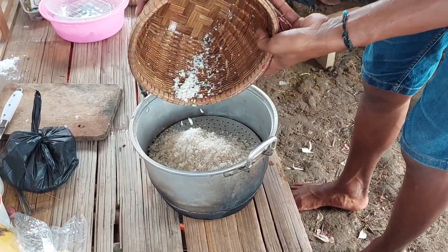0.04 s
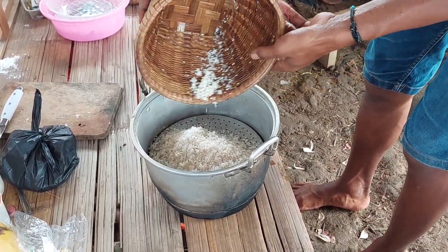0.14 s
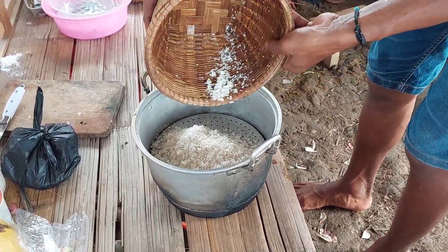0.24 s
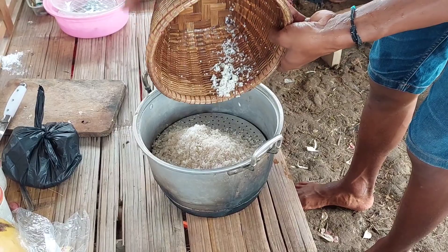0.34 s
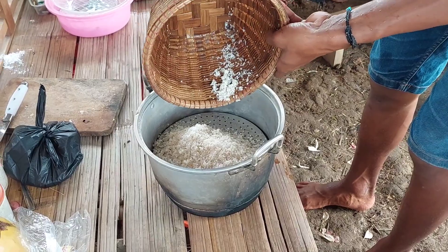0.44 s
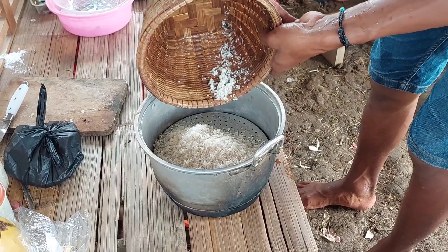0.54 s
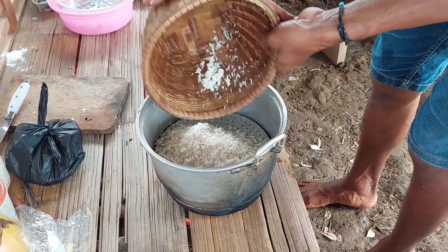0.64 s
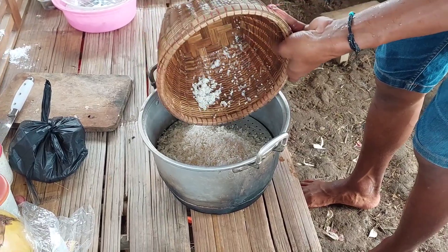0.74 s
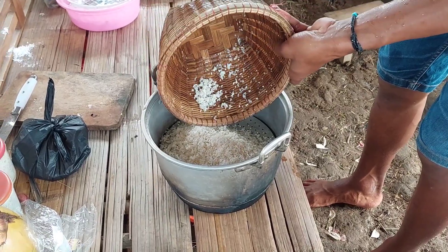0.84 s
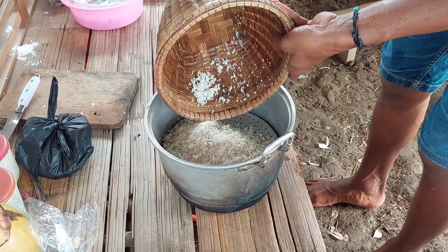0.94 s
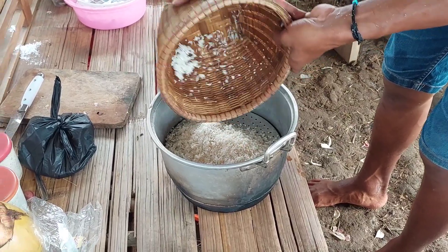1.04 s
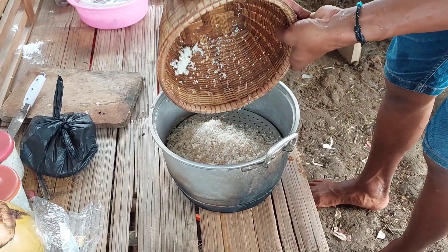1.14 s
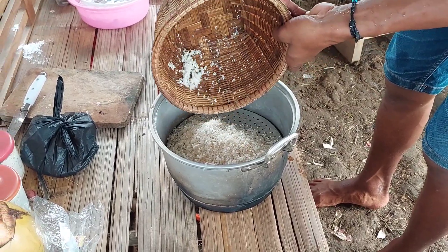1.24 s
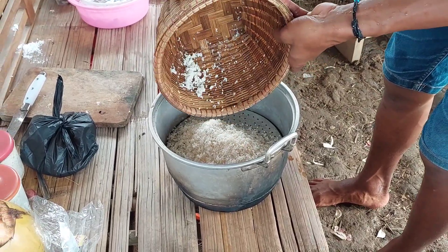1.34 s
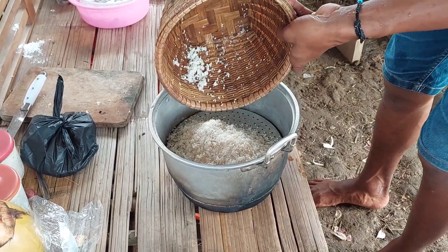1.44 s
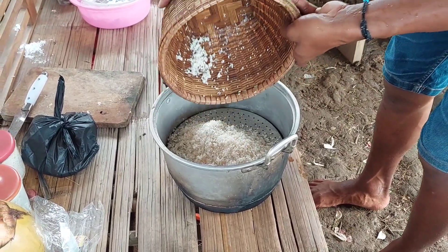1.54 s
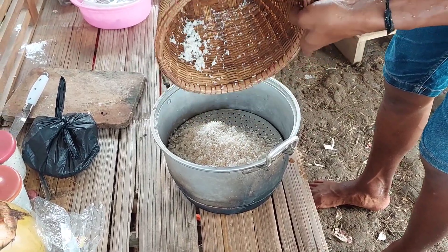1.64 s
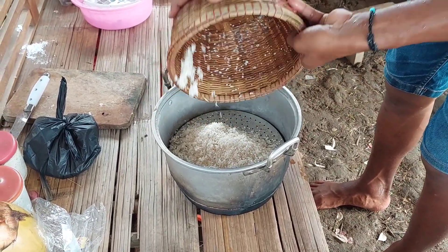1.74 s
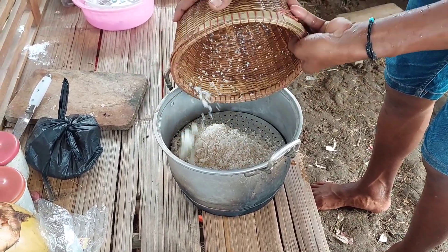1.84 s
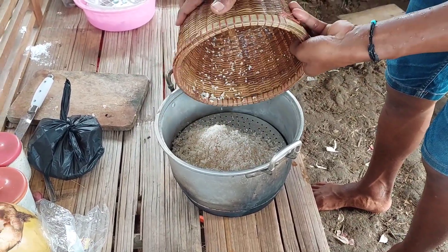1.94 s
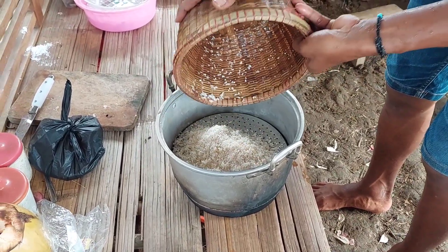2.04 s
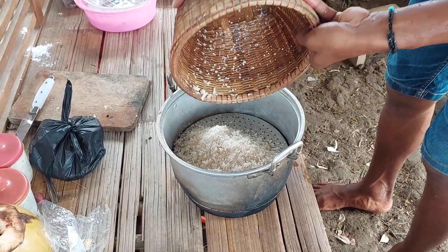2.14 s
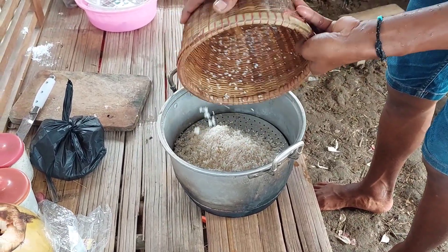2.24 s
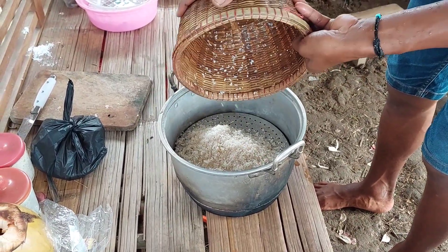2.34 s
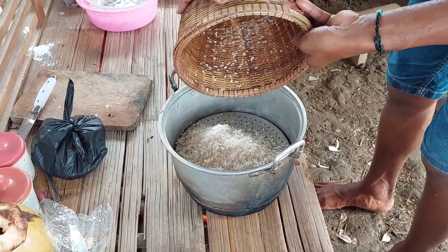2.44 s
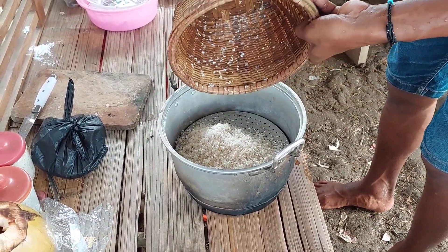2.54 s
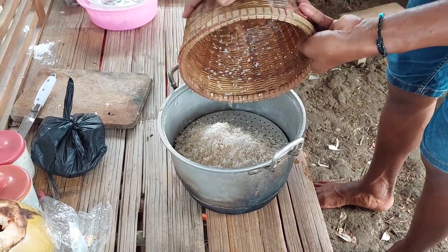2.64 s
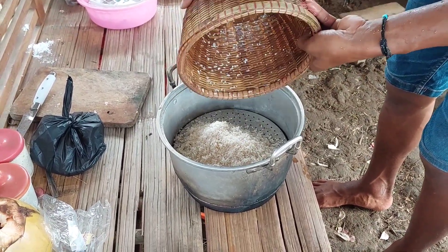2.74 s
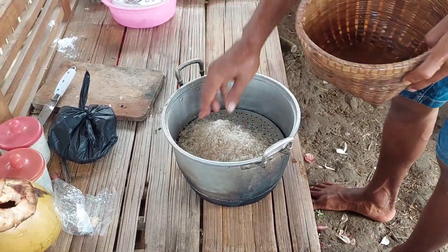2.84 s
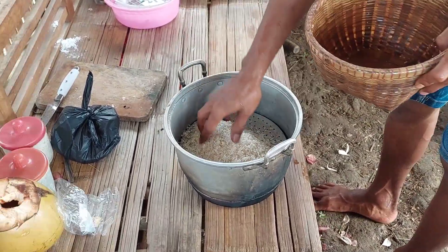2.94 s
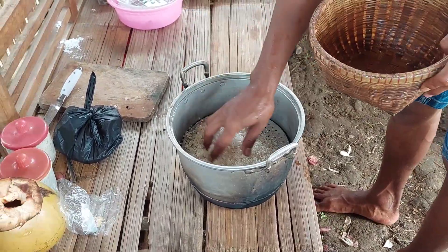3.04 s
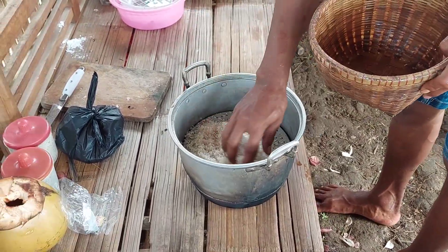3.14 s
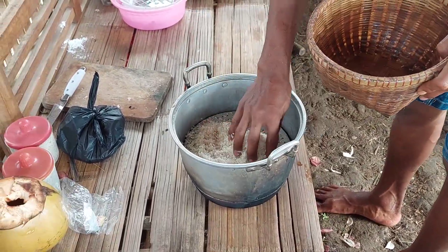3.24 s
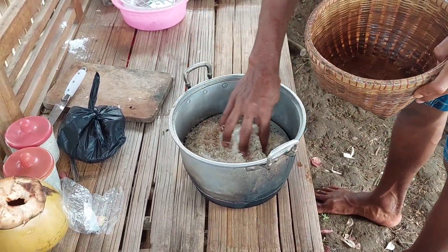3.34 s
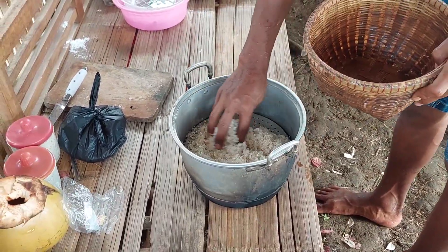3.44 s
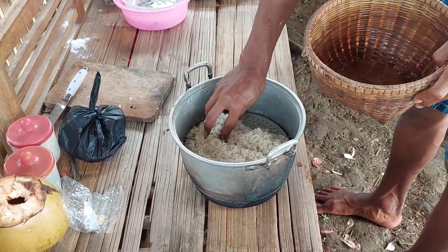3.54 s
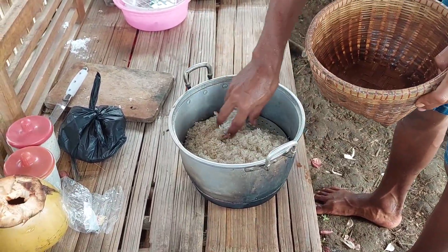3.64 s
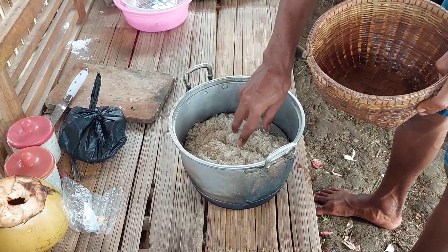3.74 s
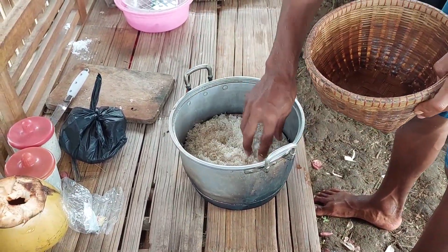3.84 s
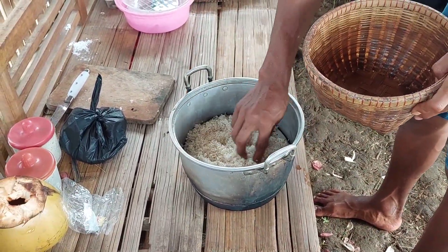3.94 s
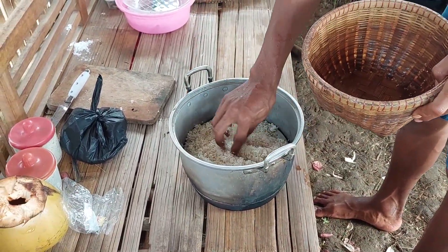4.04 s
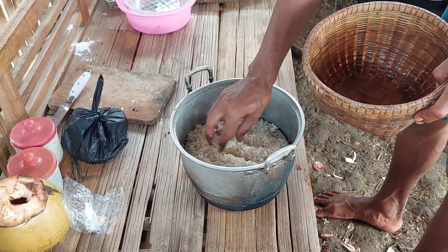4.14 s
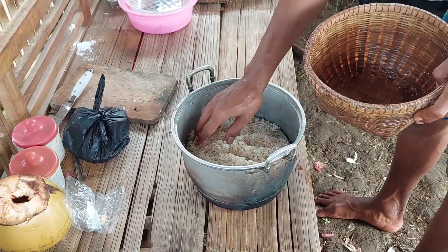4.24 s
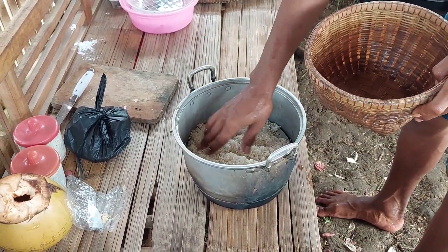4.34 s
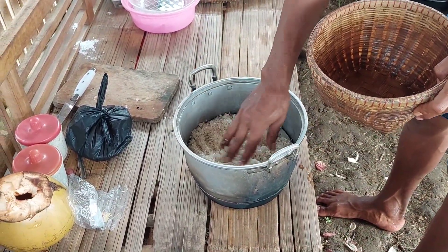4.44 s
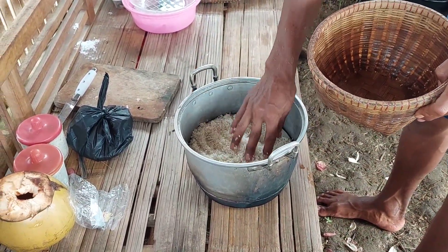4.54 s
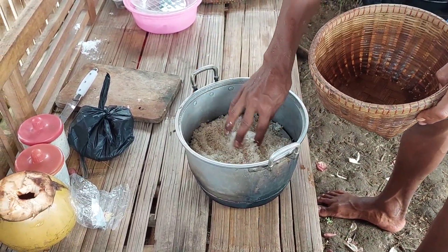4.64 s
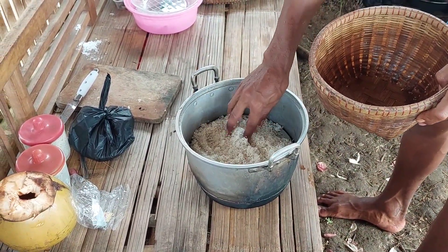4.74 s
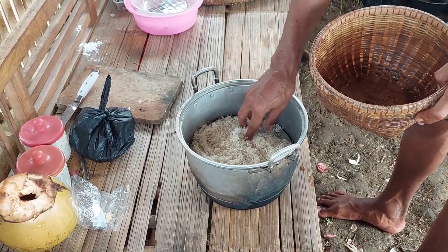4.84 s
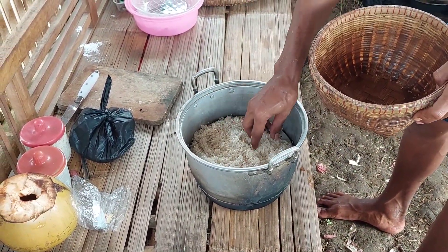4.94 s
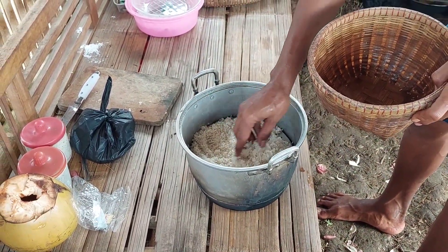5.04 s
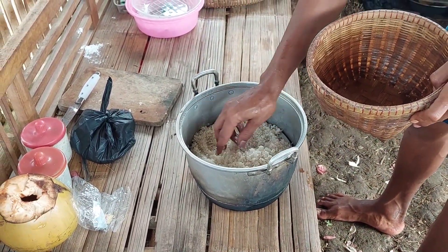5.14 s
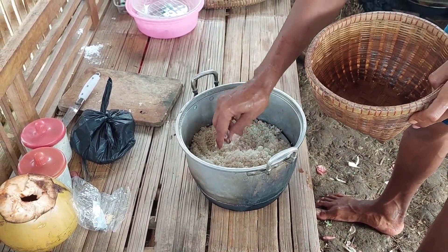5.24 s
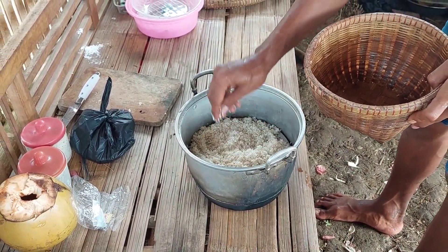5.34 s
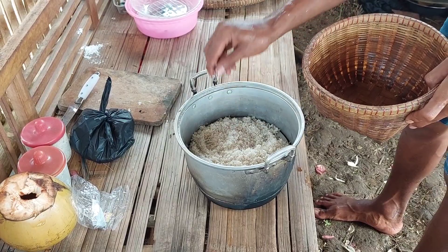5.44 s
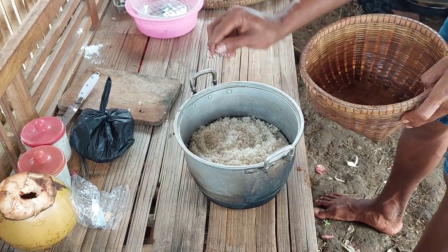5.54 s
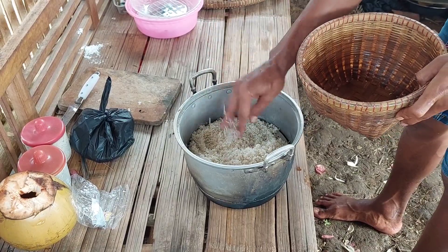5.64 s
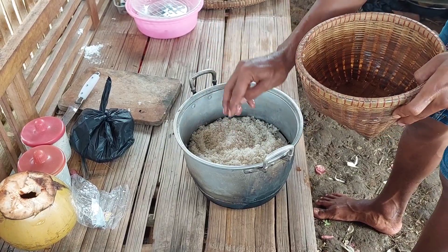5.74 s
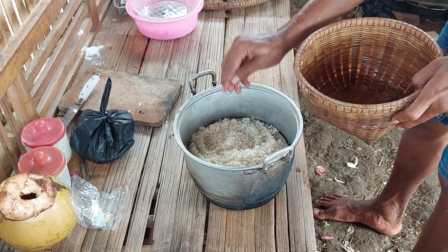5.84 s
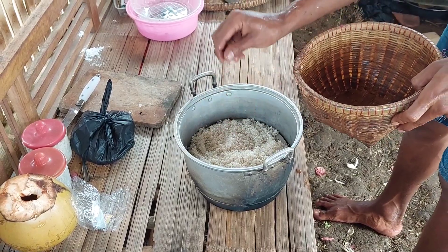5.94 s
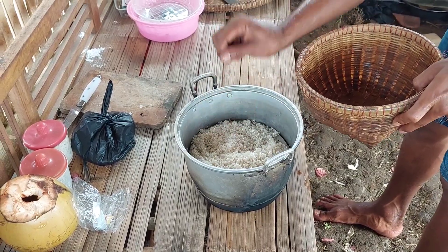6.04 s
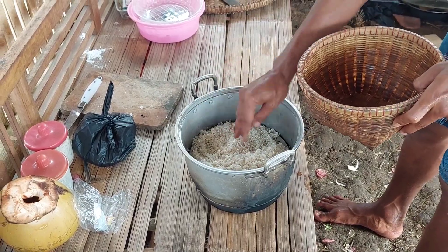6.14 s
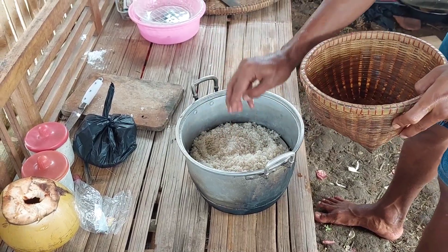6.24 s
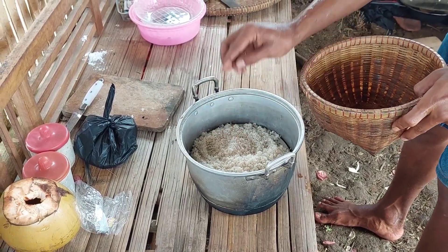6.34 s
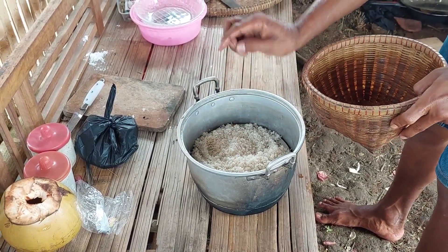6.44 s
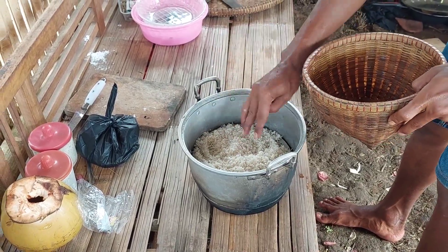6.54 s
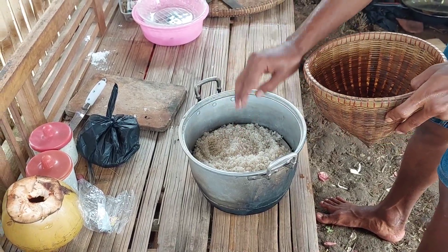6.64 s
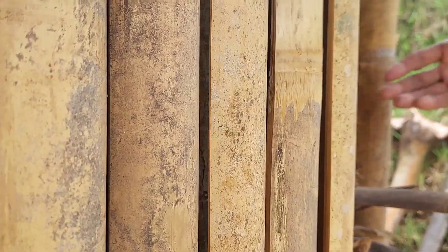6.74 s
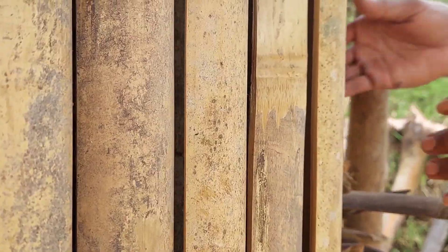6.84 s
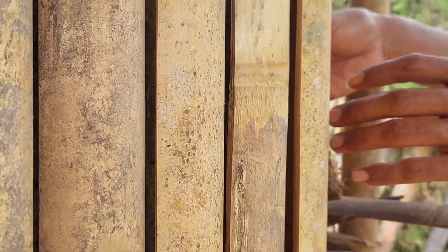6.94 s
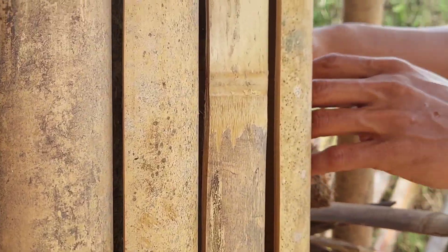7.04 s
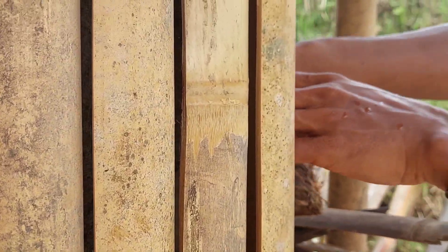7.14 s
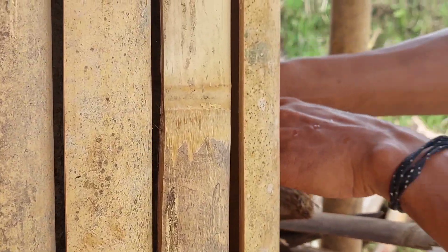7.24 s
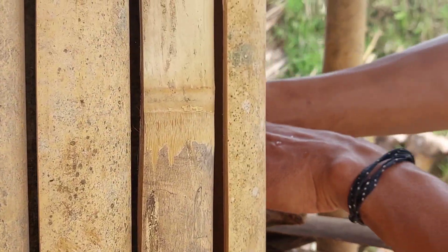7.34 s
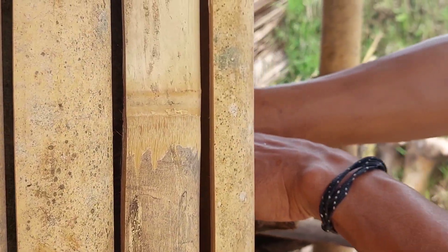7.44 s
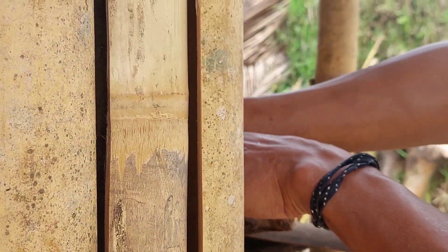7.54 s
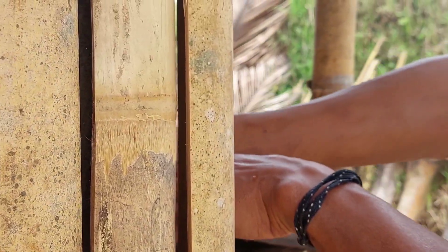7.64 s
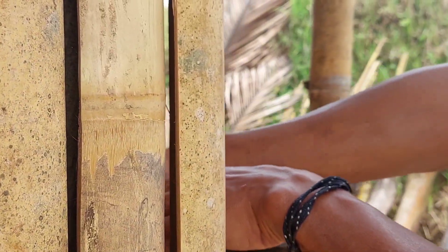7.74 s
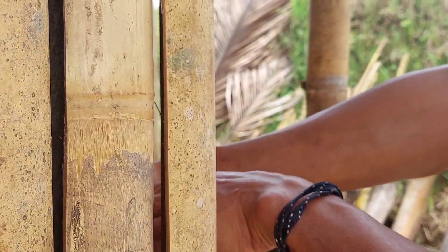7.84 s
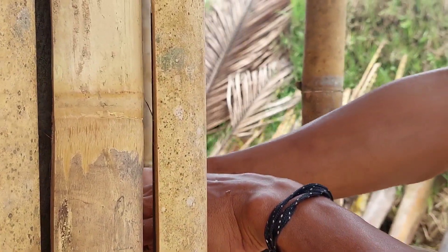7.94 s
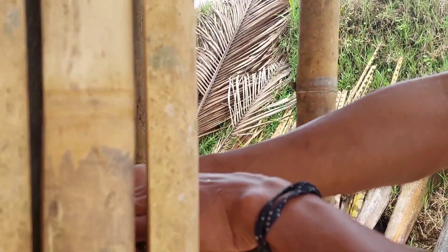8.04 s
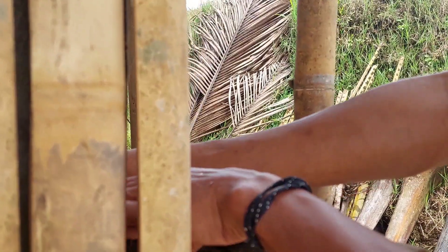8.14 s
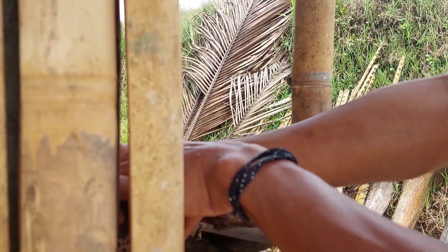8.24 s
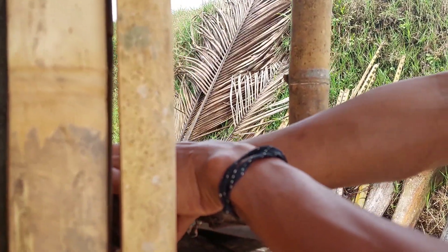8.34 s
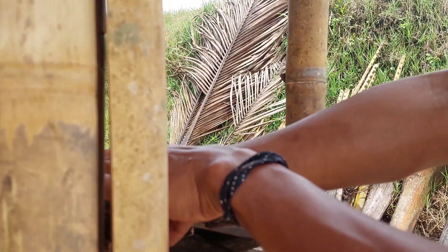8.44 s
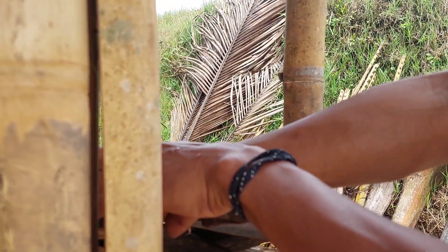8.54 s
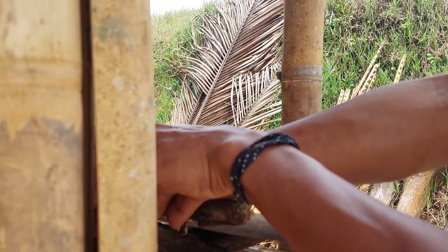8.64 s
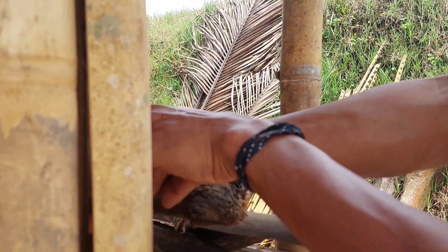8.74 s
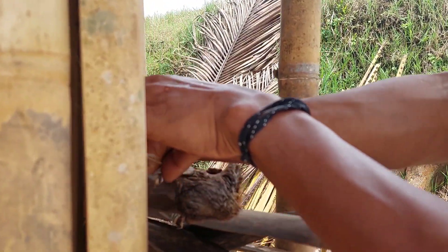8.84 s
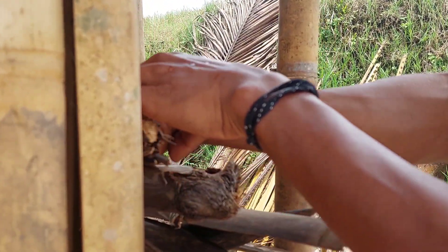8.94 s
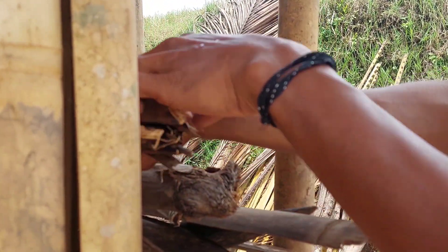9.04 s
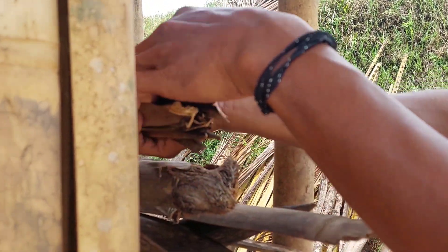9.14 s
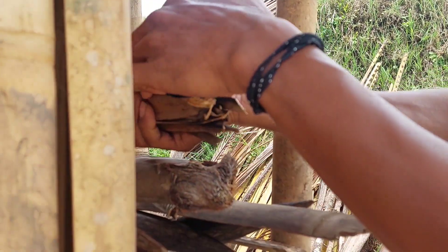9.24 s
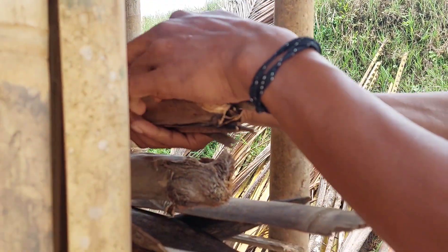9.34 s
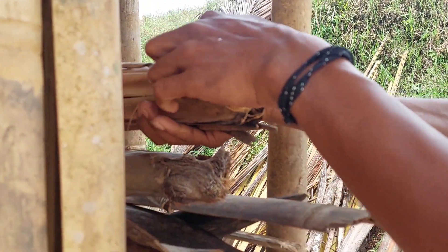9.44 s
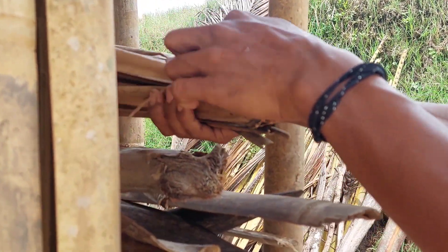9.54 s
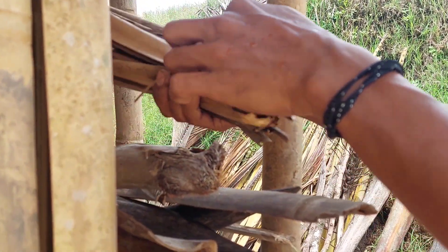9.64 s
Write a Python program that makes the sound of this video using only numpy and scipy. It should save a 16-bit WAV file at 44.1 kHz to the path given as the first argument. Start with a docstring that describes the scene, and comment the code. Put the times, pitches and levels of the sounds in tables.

```python
"""Countryside hum and hiss, filtered noise, lie under a first trickle of rice: crackling grains in slides and clumps.
In this outdoor kitchen, heard by a two-port phone, a hand knocks a woven basket over a metal pot: damped modes
with a noisy weave and crack. Fingers level the rice, with a few soft bumps in the pot. Then, much closer, dry
palm leaves are pulled and crushed as crackle flurries and short snaps. Gusts buffet each port with its own
low noise, and fluttering slaps of air top them."""
import sys
import numpy as np
from scipy import signal
from scipy.fft import rfft, irfft, next_fast_len
from scipy.io import wavfile
from scipy.ndimage import uniform_filter1d

SR = 44100
rng = np.random.default_rng(int(sys.argv[2]) if len(sys.argv) > 2 else 0)


def to_wav(sig):
    """Store sig (one row per channel, or 1-D mono) as 16-bit WAV at the path in sys.argv[1].

    Samples outside -1..1 are clipped; the rate is SR.
    """
    pcm = np.clip(np.atleast_2d(sig), -1, 1) * 32767
    pcm = np.round(pcm).astype(np.int16)
    wavfile.write(sys.argv[1], SR, pcm.T)  # frames by channels


N = 427769
T = np.arange(N) / SR
MS = T[::SR // 1000]  # slow clock, steps of about a millisecond
SIDES = np.array([[0.5], [-0.5]])  # left and right share of a left-right difference

# Distant land: f/Hz, relative level/dB per Hz
LAND_COLOUR = [(15, -39.5), (30, 1.5), (64, 1.5), (117, 3), (195, -8), (270, -5.5), (659, -16),
               (754, -20.5), (2760, -6), (7110, -9.5), (8590, -13), (14800, -12.5), (16000, -11)]
LAND_DB = -54
# Far sounds, bassier at left, which loses treble from the right: f/Hz, left minus right/dB
PORTS_FAR = [(60, 3.5), (110, 8.5), (200, 8), (380, 3.5), (700, 4.5), (1290, 1), (2380, -0.5), (4400, 1.5),
             (8120, -4), (15000, -7)]

# Rice sliding over the weave or pushed by the fingers: t/s, hold/s, patter level/dB, relative dull rattle/dB
SLIDES = [(0.138, 0.048, -57, -3), (0.228, 0.18, -60.5, -15), (0.478, 0.13, -45.5, -2.5),
          (0.647, 0.045, -49.5, -25), (0.786, 0.092, -57, -17), (0.89, 0.082, -45.5, -5),
          (0.984, 0.12, -50.5, -8.5), (1.152, 0.012, -45.5, -17), (1.212, 0.33, -61, -5),
          (1.629, 0.018, -47, -14), (1.745, 0.01, -39, -13), (1.88, 0.029, -59.5, -8),
          (2.086, 0.016, -51, -26), (2.192, 0.027, -51, -17), (2.354, 0.05, -55.5, -1.5),
          (2.492, 0.065, -53, -4.5), (2.92, 0.022, -57, -13), (2.992, 0.046, -51, -8),
          (3.064, 0.079, -42, -13), (3.196, 0.015, -55, 0), (3.31, 0.026, -56, -3), (3.415, 0.01, -44, -18),
          (3.49, 0.074, -45.5, -3), (4.295, 0.066, -55.5, -22), (4.662, 0.05, -54.5, -6),
          (5.312, 0.057, -58, -19), (5.485, 0.019, -55.5, -5), (5.65, 0.067, -57, -10.5),
          (6.297, 0.026, -61, -22)]
SLIDE_RISE_DB_S, SLIDE_FALL_DB_S = 402.5, 202
# Grain patter: f/Hz, relative level/dB per Hz
RICE_COLOUR = [(180, -45.5), (300, -6.5), (667, -1.5), (828, -2.5), (1010, -2), (1340, -1), (4090, 4.5),
               (7080, -6.5), (9240, -20.5), (12500, -10), (16000, -7.5)]
# Grains that land at once: t/s, ring peak level/dB, centre f/Hz, bright tick setting/dB relative to the ring
CLUMPS = [(0.243, -37, 2180, -28), (0.585, -27, 2330, -7), (0.698, -46, 440, 19), (1.036, -38.5, 2210, -21),
          (1.146, -29.5, 4940, 2), (1.16, -39, 3900, 3), (1.36, -42.5, 656, -21), (1.727, -30.5, 3760, -3),
          (2.117, -39.5, 1100, 14.5), (2.228, -38.5, 5860, 3), (2.569, -45, 1170, 19),
          (2.57, -38.5, 3400, -8), (2.857, -36.5, 4380, -20), (3.139, -37, 4300, 14), (3.206, -44, 5060, 8),
          (3.415, -29, 2100, -10), (3.652, -37, 2530, -11), (4.32, -40, 2870, -27), (4.359, -44, 4300, -25),
          (4.52, -41, 2720, -22), (5.369, -43.5, 3540, -20), (5.483, -34.5, 2410, -33),
          (5.757, -42.5, 2140, -20), (5.914, -40, 2070, -18), (6.295, -42.5, 2160, -23)]
TRICKLE_DB, TRICKLE_DULL_DB, TRICKLE_END_S = -63.5, -4.5, 6.85  # stray grains between the slides
BRIGHT_DB, BRIGHT_PER_DB = -6.5, 0.5  # relative treble of the patter at -51 dB; louder slides are brighter
# Edges of the flickering bands in rice and leaves: f/Hz
BAND_EDGES_HZ = [250, 700, 1400, 2500, 4300, 8000, 11500, 17000]

# Palm on the basket: t/s, level setting/dB, nominal contact/ms, struck spot f/Hz, ring length factor,
# left minus right/dB, rebound level/dB, crack setting/dB
KNOCKS = [(0.4593, -29.5, 0.1, 370, 0.84, 1.5, -11, 13.5), (0.8607, -22.5, 0.55, 520, 0.99, 0, -13.5, 10),
          (3.0353, -24, 0.5, 627, 0.58, 0, -22.5, 9)]
# Basket and pot modes, before each blow's spread: f/Hz, relative level/dB, t60/s at ring length factor 1
BASKET = [(111, 8, 0.068), (302, 6, 0.091), (404, -1, 0.045), (520, -4.5, 0.12), (590.5, -1, 0.12),
          (664, 1.5, 0.16), (757, -6.5, 0.16), (780, -5, 0.1), (911, -1.5, 0.086), (1060, 6, 0.024),
          (1355, -15, 0.051), (1990, -7.5, 0.037), (2180, -1, 0.078), (2530, -6, 0.03945)]
BOUNCE_S = 0.013  # the basket swings back against the fingers, twice

# Hand bumping softly in the pot: t/s, level/dB (4 dB below the peak), centre f/Hz
BUMPS = [(3.699, -52, 680), (4.298, -53, 304), (4.799, -51.5, 470), (4.901, -54.5, 299)]

# Crushed leaves, points on a curve: t/s, rustle level/dB, relative bright sizzle/dB, relative dull scrape/dB
LEAVES = [(6.75, -81, 6, 0), (6.95, -41, -0.5, -10.5), (7.06, -49, 1, -5.5), (7.46, -39.5, 0.5, -6.5),
          (7.6, -46, 2.5, -4), (7.73, -36, -8, -8), (7.76, -44.5, 0.5, -3.5), (7.93, -39.5, -2, -7.5),
          (8.02, -37, -2, -4), (8.065, -35, 0.5, -4), (8.1, -36, -3, -9.5), (8.122, -31, -6, -8),
          (8.165, -41, -2, -3), (8.22, -42, 0, -7.5), (8.257, -37, -3, -3), (8.275, -38, 0.5, -12),
          (8.37, -46, 4, -7), (8.51, -32.5, -6, -7), (8.52, -40, -5, -3.5), (8.85, -37, -2, -9.5),
          (8.9, -40, 1, -11), (9.2, -49.5, -9, -4.5), (9.27, -54, -11, 0), (9.35, -49.5, -11, -13),
          (9.38, -36.5, -14, -15), (9.43, -48.5, -7, -6.5), (9.5, -43.5, -7, -6.5), (9.525, -40.5, -9, -2),
          (9.57, -43, -9, -3), (9.63, -49, -7, 0.5), (9.7, -47.5, -3, -5)]
# Leaf crackle: f/Hz, relative level/dB per Hz
LEAF_COLOUR = [(290, 5.5), (500, 6), (595, 5), (855, 5), (1180, 3.5), (2330, 10), (5020, 8), (8580, 1),
               (12300, 10), (14900, 3), (16000, 11)]
# Near sounds, with the top end weaker at left: f/Hz, left minus right/dB
PORTS_NEAR = [(2000, 0), (6000, -0.5), (8000, 0.5), (10000, -13.5), (15000, -18.5)]
# Leaf ribs that snap: t/s, ring peak level/dB, centre f/Hz, bright tick setting/dB relative to the ring
SNAPS = [(6.8896, -44, 1420, 17), (7.299, -31, 5000, -10), (7.328, -27, 5630, -4),
         (7.3703, -30.5, 3840, 14), (7.378, -22, 760, -20), (7.441, -17.5, 4170, -2), (7.467, -27, 3800, 0),
         (7.555, -32, 3000, -8), (7.589, -33, 3200, -8), (7.6262, -32, 5040, 9), (7.645, -20.5, 2870, -2),
         (7.68, -28, 4800, 0), (7.7095, -19.5, 2800, -6), (7.7138, -13.5, 820, -20),
         (7.7145, -17.5, 2400, -0.5), (7.7876, -31.5, 3600, 6.5), (7.845, -25, 2950, 3),
         (7.874, -25, 2800, -4), (7.9408, -22.5, 2400, 2.5), (8.0032, -20, 3050, -14),
         (8.0365, -19.5, 2260, -14), (8.065, -13, 2440, -4), (8.1917, -25.5, 5200, 4),
         (8.2497, -18.5, 3080, -23), (8.2937, -17.5, 3230, -23), (8.45, -24, 2180, -10),
         (8.4914, -19, 1830, -8), (8.556, -19.5, 2720, -6), (8.5815, -15.5, 1870, 0),
         (8.6246, -25.5, 2360, 9), (8.7006, -22, 2180, -18), (8.7399, -20.5, 3000, 7),
         (8.8044, -17.5, 2120, -1), (8.838, -21, 2620, -5), (8.985, -22, 2030, 1), (9.047, -24, 1990, 6),
         (9.1446, -23, 3930, -37), (9.1757, -23, 4540, -11), (9.1765, -25.5, 1370, -20),
         (9.2056, -29, 3560, -29), (9.3616, -19.5, 2460, -26), (9.3886, -25, 3370, -6),
         (9.4706, -29, 2870, -19), (9.5138, -16, 4900, -2.5)]
TICKS_PER_S, TICK_DB, TICK_MS = 43, 6.5, 0.99  # small veins that break: rate, gain, decay time
FLURRY_DB = 1  # spread of the crackle's level

# Gusts on one port: t/s, hold/s, buffet level/dB before speed shaping, port (0 left, 1 right)
GUSTS = [(6.942, 0.032, -46, 0), (7.092, 0.14, -44, 1), (7.3, 0.087, -40.5, 1), (7.384, 0.026, -40, 0),
         (7.44, 0.039, -20.5, 1), (7.658, 0.046, -30, 1), (7.712, 0.027, -20, 1), (7.808, 0.18, -39.5, 1),
         (7.936, 0.096, -25, 1), (7.995, 0.035, -35, 0), (8.094, 0.022, -31, 0), (8.183, 0.17, -33.5, 1),
         (8.271, 0.22, -28, 1), (8.326, 0.14, -35.5, 0), (8.508, 0.1, -24, 1), (8.497, 0.16, -26.5, 0),
         (8.65, 0.2, -33, 1), (8.694, 0.054, -22, 0), (8.786, 0.062, -27.5, 0), (8.886, 0.12, -26, 1),
         (8.938, 0.041, -20.5, 0), (9.003, 0.011, -15.5, 0), (9.055, 0.018, -19, 0),
         (9.067, 0.018, -21.5, 1), (9.137, 0.048, -36, 0), (9.139, 0.048, -32.5, 1), (9.24, 0.045, -45, 0),
         (9.293, 0.038, -41, 1), (9.346, 0.14, -40, 0), (9.37, 0.16, -38, 1), (9.52, 0.2, -29.5, 1),
         (9.543, 0.061, -45, 0), (9.66, .06, -52, 0)]
GUST_RISE_DB_S, GUST_FALL_DB_S = 750, 426
# Light air on both ports: t/s, hold/s, level/dB before speed shaping
BREEZE = [(6.94, 2.25, -48.5)]
# Eddies: f/Hz, relative level/dB per Hz
GUST_COLOUR = [(15, -51), (25, -21.5), (59, 10), (140, -1.5), (184, -5.5), (340, -11.5), (401, -22.5),
               (591, -30.5), (900, -53), (1980, -120)]
# Sudden slaps of air on one port: t/s, peak level/dB, mean flutter f/Hz, length/s, port (0 left, 1 right)
SLAPS = [(7.433, -13, 142, 0.026, 1), (7.708, -13.5, 131, 0.029, 1), (8.701, -13.5, 135, 0.056, 0),
         (8.794, -12, 110.4, 0.024, 0), (8.932, -13.5, 191.6, 0.028, 0), (9.001, 8.5, 166.5, 0.0272, 0),
         (9.048, -6, 168, 0.026, 0), (9.076, -30, 121, 0.0296, 0)]

PORT_LOW_HZ, CAPSULE_HZ, TOP_HZ = 40, 15850, 16600  # bass roll-off, capsule stop band, final cutoff
LIMIT_DB, LIMIT_RATIO, LIMIT_S = -11.5, 3, 0.0122  # one gain for both ports


def undb(db):
    """Turns dB into an amplitude factor."""
    return 10 ** (np.asarray(db) / 20)


def level(x, db):
    """Sets the RMS level over both ports together."""
    return x * undb(db) / np.sqrt(np.mean(x ** 2))


def even(x, window_s):
    """Keeps the fine grain, takes out the chance swells longer than the window."""
    return x / np.sqrt(uniform_filter1d(x ** 2, int(window_s * SR)) + 1e-9)


def band(x, lo_hz, hi_hz, order=2):
    """Butterworth band-pass."""
    return signal.sosfilt(signal.butter(order, [lo_hz, min(hi_hz, .45 * SR)], "band", fs=SR, output="sos"), x)


def colour(x, table, ports=((100, 0), (200, 0)), size=4096):
    """Causal filter from (Hz, dB) points; each port gets its share of the left-right difference."""
    log_hz = np.log(np.maximum(np.arange(size // 2 + 1), .5) * SR / size)

    def response(points):
        hz, db = np.array(points).T
        return np.interp(log_hz, np.log(hz), db)

    db = response(table) + SIDES * response(ports)
    # fold the cepstrum forward in time: minimum phase
    cepstrum = irfft(db * np.log(10) / 20)
    cepstrum[:, 1:size // 2] *= 2
    cepstrum[:, size // 2 + 1:] = 0
    impulse = irfft(np.exp(rfft(cepstrum)))
    return signal.oaconvolve(x, impulse, axes=1)[:, :N]


def curves(table):
    """Columns joined by straight lines in time."""
    s, *columns = np.array(table).T
    return [np.interp(T, s, c) for c in columns]


def walk(rate):
    """Random levels held 1 / rate s and slewed twice; spread near 1."""
    k = int(SR / rate)
    steps = np.repeat(rng.standard_normal(N // k + 1), k)
    return 2.06 * uniform_filter1d(uniform_filter1d(steps, k), k)[:N]


def swells(table, rise, fall):
    """Power of each row on the slow clock: a rise to its start, a hold, a fall, straight in dB."""
    s, hold, db = np.array(table).T[:3, :, None]
    early, late = np.maximum(s - MS, 0), np.maximum(MS - s - hold, 0)
    return undb(2 * (db - rise * early - fall * late))


def power_db(power):
    """Slow power to dB at every sample."""
    return np.interp(T, MS, 10 * np.log10(power + 1e-18))


def add(out, s, sound):
    """Mixes a sound in at s seconds."""
    i = int(s * SR)
    out[:, i:i + sound.shape[1]] += sound[:, :N - i]


def burst(t60, size=6000, rise_ms=0.44):
    """A dying noise, different at each port."""
    t = np.arange(size) / SR
    return rng.standard_normal((2, size)) * np.minimum(1000 * t / rise_ms, 1) * 1000. ** (-t / t60)


def crackle(rate, spread_db, tail_ms, ping_db):
    """Tiny uneven contacts: quick dying bursts, different at each port; about one in five rings at a pitch."""
    hits = (rng.random(N) < rate / SR) * undb(spread_db * np.minimum(rng.exponential(size=N), 4.2))
    power = signal.lfilter([1], [1, -np.exp(-1000 / (tail_ms * SR))], hits ** 2)
    pitch, pings = rng.integers(0, 40, N), 0
    for k, hz in enumerate(np.geomspace(1900, 7000, num=8)):
        r = np.exp(-hz / 6 / SR)
        resonator = [1, -2 * r * np.cos(2 * np.pi * hz / SR), r * r]
        pings = pings + np.sqrt(hz) * hz * signal.lfilter([1], resonator, hits * (pitch == k))
    pings = np.array([np.roll(pings, 6), pings])  # left hears them 6 samples later
    bursts = np.sqrt(power) * rng.standard_normal((2, N))
    return even(level(bursts, 0) + level(pings, ping_db), 0.098)


def rustle(x, db, bright_db, dull_db, flicker_db, apart=False):
    """Splits into seamless bands that flicker like small and large pieces; dull and bright parts swell apart."""
    size = next_fast_len(N)
    spectrum = rfft(x, size)
    octave = np.log2(np.maximum(np.arange(size // 2 + 1), 1) * SR / size)
    above = [np.clip((octave - np.log2(hz)) / .6 + .5, 0, 1) for hz in BAND_EDGES_HZ]
    parts = [irfft(spectrum * (a - b), size)[:, :N] * undb(flicker_db * walk(45))
             for a, b in zip(above, above[1:])]
    if apart:  # shifted in time, the lower bands have contacts of their own
        parts = [np.roll(even(part, .05), min(k, 4) * N // 7, axis=1) for k, part in enumerate(parts)]
    groups = (parts[:2], dull_db), (parts[2:5], 0), (parts[5:], bright_db)
    return sum(level(sum(group), 0) * undb(db + extra_db) for group, extra_db in groups)


def taps(table, t60, width, order, ports_db, rise_ms, click_db):
    """Single contacts: a short ring around their pitch with a wider click and a bright tick on top."""
    out = np.zeros((2, N))
    for s, db, hz, bright_db in table:
        ring = band(burst(t60, rise_ms=rise_ms), hz / width, hz * width, order=order)
        ring = ring + 0.23 * ring[0]  # partly shared by the ports
        tick = undb(bright_db + ports_db * SIDES) * band(burst(0.47 * t60), 11520, 12800, order=1)
        click = undb(click_db) * band(burst(0.011), hz / 2, hz * 2, order=1)
        add(out, s, undb(db) * (ring / np.abs(ring).max() + click + 0.95 * tick))
    return out


def land():
    """Distant hum and hiss; the bass is shared by both ports and wavers a little."""
    own, shared = rng.standard_normal((2, N)), rng.standard_normal(N)
    air = own + 1.8 * band(shared, 30, 500, order=1) * undb(walk(12))
    return level(colour(air * undb(1.1 * walk(18)), LAND_COLOUR, PORTS_FAR), LAND_DB)


def rice():
    """A dense patter of grains, and clumps that land together."""
    stray = undb(2 * TRICKLE_DB)
    slides = swells(SLIDES, SLIDE_RISE_DB_S, SLIDE_FALL_DB_S)
    power = stray + slides.sum(0)
    dull = stray * undb(2 * TRICKLE_DULL_DB) + undb(2 * np.array(SLIDES)[:, 3]) @ slides
    patter = colour(crackle(1800, 6.3, 4.6, ping_db=-13.5), RICE_COLOUR, PORTS_FAR)
    flow_db = power_db(power)
    bright_db = BRIGHT_DB + BRIGHT_PER_DB * (flow_db + 51.0)
    flow = rustle(patter, flow_db, bright_db, power_db(dull / power), flicker_db=2.15, apart=True)
    clumps = taps(CLUMPS, 0.084, 1.21, order=2, ports_db=-4.0, rise_ms=1.0, click_db=0)
    return flow * (T < TRICKLE_END_S) + clumps


def basket_ring(t, spot_hz, length):
    """Damped modes, strongest near the struck spot, with chance in level, pitch and port phase."""
    chance, ring = rng.standard_normal((len(BASKET), 3)), 0
    for k, ((hz, db, t60), c) in enumerate(zip(BASKET, chance)):
        sign = (-1) ** (k // 2)  # neighbouring pairs of modes start in opposite directions
        gain = undb(db + c[0] - 3.7 * abs(np.log2(hz / spot_hz)))
        phase = 2 * np.pi * hz * (1 + 0.0049 * c[1]) * t + hz / 2500 * c[2] * SIDES
        ring = ring + sign * gain * 1000. ** (-t / (length * t60)) * np.sin(phase)
    # the first swings are stronger: the hand stays on the cane and damps it
    return ring * (1 + 1.1 * np.exp(-t / 0.0026))


def knocks():
    """Each blow is a short push with two rebounds into the modes, plus weave rattle and the crack of the cane."""
    out, t = np.zeros((2, N)), np.arange(8000) / SR
    for s, db, contact_ms, spot_hz, length, pan_db, bounce_db, crack_db in KNOCKS:
        ring = basket_ring(t, spot_hz, length)
        push = np.hanning(int(contact_ms * SR / 1000) + 3)
        push = np.pad(push, (0, int(BOUNCE_S * SR) - len(push)))
        push = np.r_[push, undb(bounce_db) * push, undb(2 * bounce_db) * push][None]
        ring = level(band(signal.fftconvolve(ring, push)[:, :len(t)], 80, 12000), -8)
        # the loose weave rattles along between the modes
        weave = band(burst(0.16 * length, size=len(t)), spot_hz / 5.4, spot_hz * 1.3)
        weave = weave + 1.67 * weave[0]
        crack = band(burst(0.0475, size=len(t)), 1500, 3400) + 0.17 * burst(0.018, size=len(t))
        blow = ring + undb(crack_db) * crack + undb(8) * weave
        add(out, s, undb(db + pan_db * SIDES) * blow)
    return out


def bumps():
    """Dull, slow contacts: dying band noise, nearly alike at both ports."""
    out = np.zeros((2, N))
    for s, db, hz in BUMPS:
        thud = band(burst(0.42), hz / 1.34, hz * 1.34)
        thud = thud + 1.4 * thud[0]
        add(out, s, undb(db + 4.0) * thud / np.abs(thud).max())
    return out


def ticks():
    """Breaking veins: sparse sudden pulses that die within milliseconds."""
    hits = (rng.random(N) < TICKS_PER_S / SR) * rng.random(N) * 2
    return undb(TICK_DB) * signal.lfilter([1], [1, -np.exp(-1000 / (TICK_MS * SR))], hits)


def leaves():
    """Brittle blades crackle in flurries, veins tick in the treble; ribs snap over them."""
    blades = crackle(600, 3.33, 5.9, ping_db=-12) * undb(FLURRY_DB * walk(30))
    blades = colour(blades, LEAF_COLOUR, PORTS_NEAR)
    # the ports are unrelated, so each is louder than their mean by the root of two
    flurry = rustle(blades, *curves(LEAVES), flicker_db=1.0) * np.sqrt(2) * (T > LEAVES[0][0])
    veins = band(flurry * ticks(), 9300, 18000)
    snaps = taps(SNAPS, 0.045, 1.195, order=1, ports_db=-18.0, rise_ms=1.0, click_db=-7.5)
    return flurry + veins + snaps


def wind():
    """Unrelated lumpy eddies at each port; strong gusts are faster, so less deep, with sharp peaks."""
    gusts = swells(GUSTS, GUST_RISE_DB_S, GUST_FALL_DB_S)
    right = np.round(np.array(GUSTS)[:, 3])
    breeze = swells(BREEZE, GUST_RISE_DB_S, GUST_FALL_DB_S)[0]
    port_db = np.array([power_db(breeze + share @ gusts) for share in (1 - right, right)])
    eddies = level(colour(rng.standard_normal((2, N)), GUST_COLOUR), 0)
    eddies = eddies * undb(1.55 * np.array([walk(25), walk(25)]))
    speed = np.clip((port_db + 31.0) / 18, 0, 1)  # 0 calm to 1 strong
    eddies = (1 - 0.57 * speed) * eddies + 1.34 * speed * band(eddies, 95, 274)
    eddies = even(eddies, 0.037)
    # the squares sharpen the peaks on one side
    pressure = (eddies + 0.1 * eddies ** 2) * undb(port_db + 3.0 * speed)
    return band(pressure + 2.0 * pressure ** 2, 21, 1100, order=3)


def slaps():
    """Air slapping one port: a few uneven flutters with sharp crests and round troughs."""
    out = np.zeros((2, N))
    for s, db, hz, length, port in SLAPS:
        t = np.arange(int(length * SR)) / SR
        phase = 2 * np.pi * (hz * t + rng.random() + 0.2 * np.sin(2 * np.pi * t / length))
        crests = np.exp(3.2 * np.cos(phase)) * np.hanning(len(t))
        flutter = band(np.pad(crests, (0, 2000)), 70, 900, order=1)
        add(out[int(round(port))][None], s, undb(db) * flutter[None] / np.abs(flutter).max())
    return out


def scene():
    """Layers in order of first appearance."""
    return land() + rice() + knocks() + bumps() + leaves() + wind() + slaps()


def record(dry):
    """The capsule falls off at both ends, a limiter ducks both ports when loud, then soft clip and steep top cut."""
    x = signal.sosfilt(signal.cheby2(10, 25, CAPSULE_HZ, fs=SR, output="sos"), dry)
    x = signal.sosfilt(signal.butter(2, PORT_LOW_HZ, "high", fs=SR, output="sos"), x)
    loud = np.sqrt(uniform_filter1d(np.max(x ** 2, axis=0), int(LIMIT_S * SR)) + 1e-12)
    x = x * np.minimum(undb(LIMIT_DB) / loud, 1) ** (1 - 1 / max(LIMIT_RATIO, 1))
    x = 1.5 * np.tanh(x / 1.5)
    return signal.sosfilt(signal.ellip(10, .2, 70, TOP_HZ, fs=SR, output="sos"), x)


dry = scene()
out = record(dry)
to_wav(out)
```